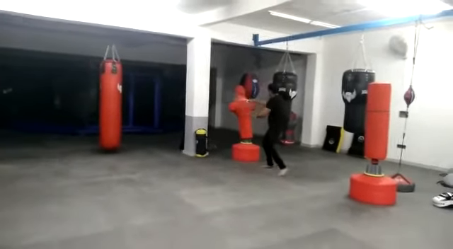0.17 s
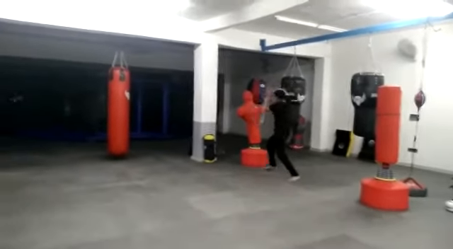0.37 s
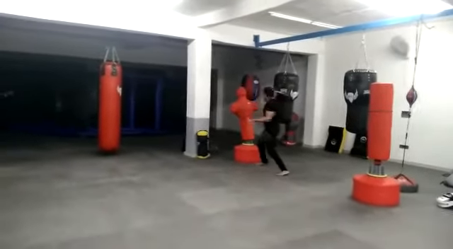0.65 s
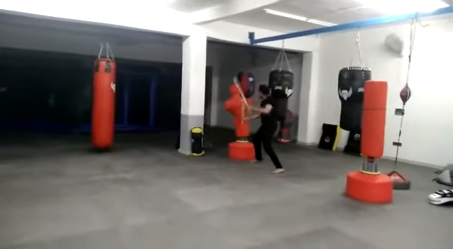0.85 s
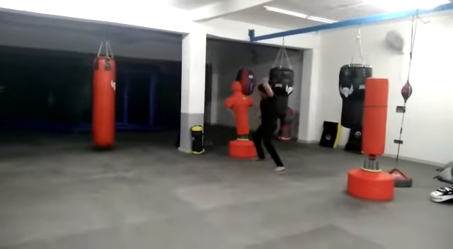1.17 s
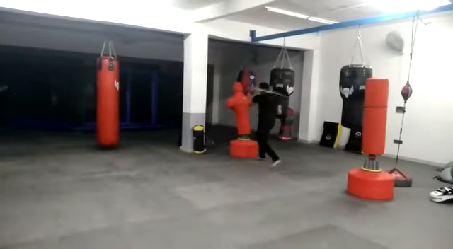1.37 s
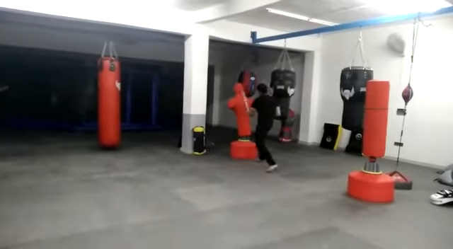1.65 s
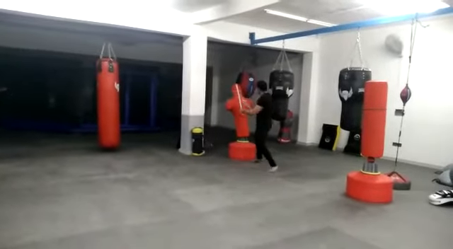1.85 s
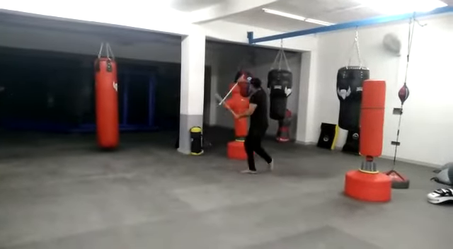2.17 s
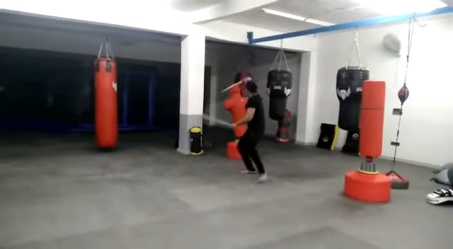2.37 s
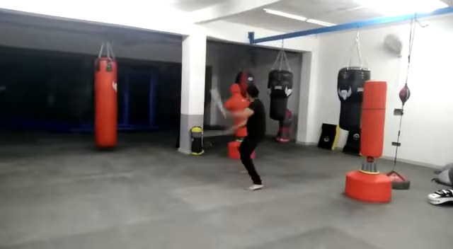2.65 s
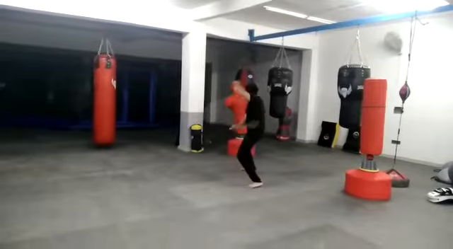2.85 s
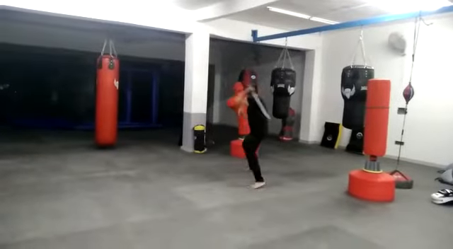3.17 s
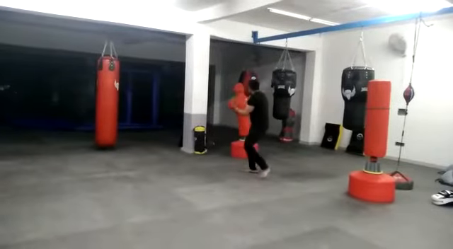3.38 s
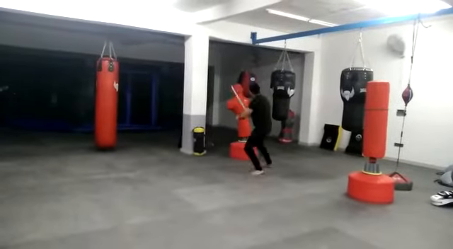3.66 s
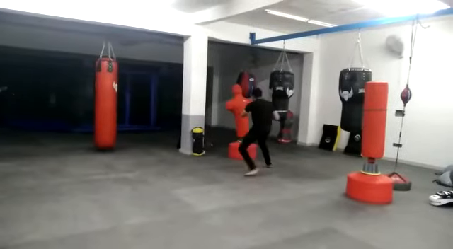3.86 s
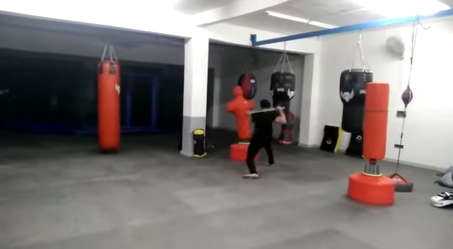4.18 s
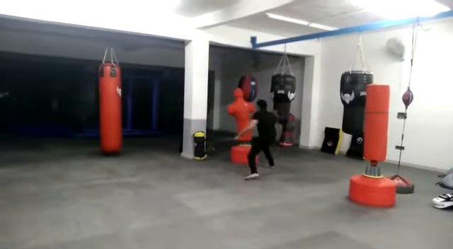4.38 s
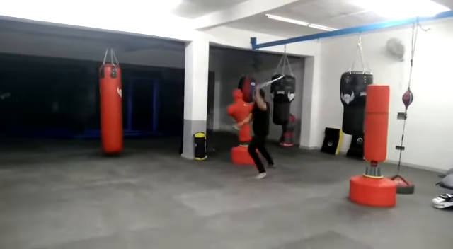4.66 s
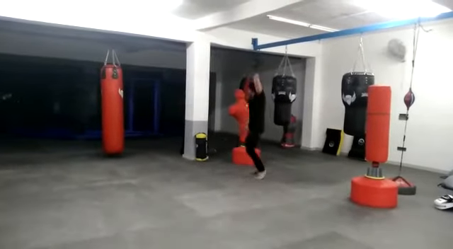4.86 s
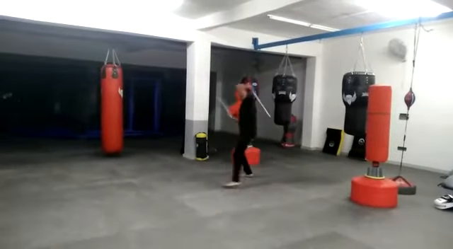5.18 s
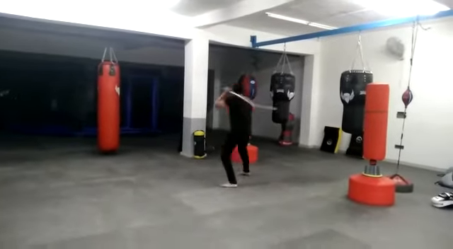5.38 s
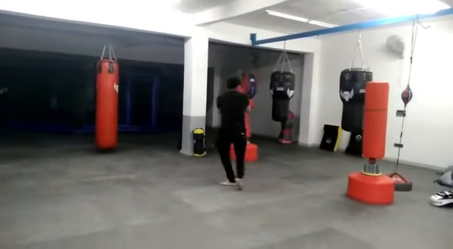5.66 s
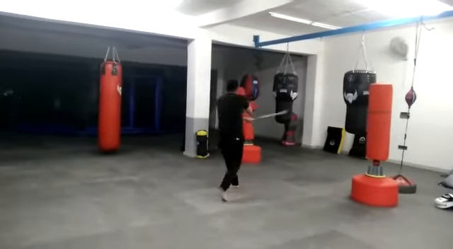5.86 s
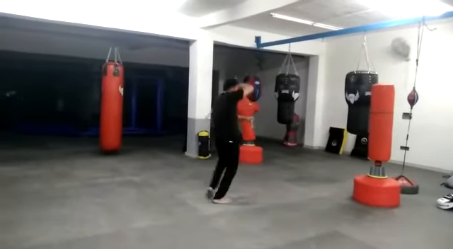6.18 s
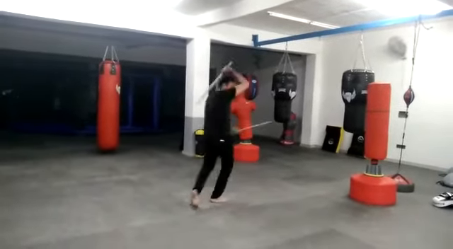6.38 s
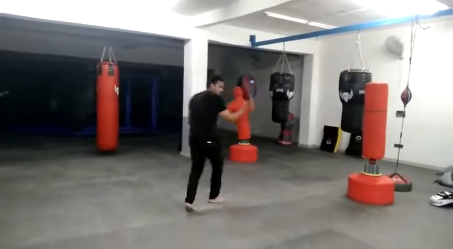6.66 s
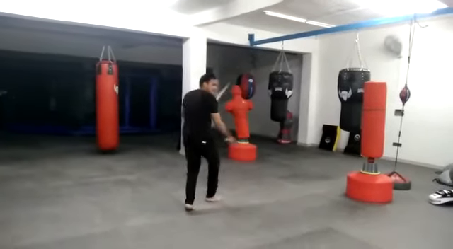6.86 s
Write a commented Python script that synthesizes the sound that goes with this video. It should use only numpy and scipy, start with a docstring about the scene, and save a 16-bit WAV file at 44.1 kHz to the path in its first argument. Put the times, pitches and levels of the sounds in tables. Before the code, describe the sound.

A large, hard-walled gym hall heard through a phone placed well away from the action, with a low steady rumble and a soft grainy mid-band noise that swells and sinks. Bare feet patter in dull low thuds and brush the mats. At about 0.85 s two sharp cracks on a vinyl dummy land almost together, bright and loud, followed by a long echo. At 1.6 s comes a single heavy smack with a deeper padded thump and hollow knock, then a low foot thud. At 2.1 s one lighter, dry wooden clack of stick on stick. From 2.5 to 4.3 s the tail fades over small scuffs and steps. Two weaker, tight double blows hit at 4.4 and 4.65 s, the second duller. From 5 s onward only sliding, hissing soles and soft thuds remain, longest around 5.5 to 6.3 s, as the reverberation dies away by 7 s.

```python
"""A bare gym hall: at its far end someone drills with two sticks on a free-standing punching dummy.
Blows are a noise crack on the vinyl skin, a damped sine thump and shell modes; once the sticks clack.
Bare feet thud (damped sines) and scuff (grainy noise) on the mats; a soft mid-band noise swells and sinks.
The hall rings for up to two seconds and more in the bass, over a low rumble; the phone flattens loud peaks."""
import sys
import numpy as np
from scipy import signal
from scipy.fft import rfft, irfft
from scipy.io import wavfile

SR = 44100
rng = np.random.default_rng(int(sys.argv[2]) if len(sys.argv) > 2 else 0)


def store_wav(level_fs):
    """Save 16-bit WAV to argv[1]."""
    pcm = np.round(np.clip(np.atleast_2d(level_fs), -1, 1) * 32767)
    wavfile.write(sys.argv[1], SR, pcm.T.astype(np.int16))


N = 310032
SIZE = 32768  # samples in one short sound
T = np.arange(SIZE) / SR  # s


def undb(db):
    """Decibels to gain."""
    return 10 ** (np.asarray(db) / 20)


def curve(points, hz):
    """Read a table along a logarithmic frequency axis."""
    table_hz, value = np.transpose(points)
    return np.interp(np.log(hz + 1), np.log(table_hz), value)


def fade(t, t60_s):
    """Exponential decay, 60 dB in t60_s."""
    return np.exp(-np.log(1000) * t / np.maximum(t60_s, 1e-4))


def level(x, db):
    """Scale a short sound so that its energy, spread over a tenth of a second, has this rms."""
    return x * undb(db) / np.sqrt(np.sum(x ** 2) * 10 / SR)


def colour(x, points, tilt_db_per_octave=0):
    """Causal minimum-phase filter with the given spectrum, tilted about 3 kHz."""
    hz = np.fft.rfftfreq(len(x), 1 / SR)
    octaves = np.log2(np.maximum(hz, 400) / 3000)
    gain = undb(curve(points, hz) + tilt_db_per_octave * octaves)
    # fold the cepstrum onto positive time
    cepstrum = irfft(np.log(gain), len(x))
    cepstrum[1:len(x) // 2] *= 2
    cepstrum[len(x) // 2 + 1:] = 0
    return irfft(rfft(x) * np.exp(rfft(cepstrum)), len(x))


def filtered(x, order, hz, kind="low"):
    """Butterworth filter."""
    return signal.sosfilt(signal.butter(order, hz, kind, fs=SR, output="sos"), x)


def add(track, start_s, x):
    """Mix a sound into a track."""
    i = int(start_s * SR)
    track[..., i:i + x.shape[-1]] += x[..., :N - i]


def tail(build_s=0.0063):
    """Dense reflections that build up quickly and die at each frequency's own rate."""
    # decay; the mats soak up a narrow band near 600 Hz: pitch_hz, t60_s
    hall_decay = [(50, 1.8), (120, 2.45), (240, 1.89), (380, 1.6), (500, 0.84), (600, 0.58), (740, 1.03),
                  (1000, 1.53), (1800, 1.93), (2800, 1.56), (4000, 1.195), (5600, 1.025), (8000, 0.87),
                  (13000, 0.47)]
    hz, t, z = signal.stft(rng.standard_normal(4 * SIZE), SR, nperseg=1024)
    decay = fade(t, curve(hall_decay, hz)[:, None])
    x = signal.istft(z * decay, SR)[1]
    build_up = 1 - np.exp(-np.arange(len(x)) / SR / build_s)
    return x * build_up * np.sqrt(10 / SR)


def hall(x, direct_db=-9.5, boom_hz=79, boom_q=12, boom_db=-3.5):
    """Direct sound, first echoes and a tail with a floor-to-ceiling standing wave; stereo in the treble."""
    # first reflections off floor, ceiling and wall: delay_s (varied by up to 10 %), level_db
    first_echoes = [(.0022, -26.5), (.0078, -11), (0.014, -17.5)]
    # difference between the two microphones: pitch_hz, side_db
    stereo_width = [(3700, -75), (4400, -16), (6000, -13), (7500, -4), (14000, -5)]
    mid = tail()
    boom = signal.lfilter(*signal.iirpeak(boom_hz, boom_q, SR), mid)
    mid = mid + undb(boom_db) * boom
    mid[0] += undb(direct_db)
    for delay_s, echo_db in first_echoes:
        mid[int(delay_s * SR * rng.uniform(.9, 1.1))] += undb(echo_db)
    side = colour(tail(), stereo_width)
    return signal.fftconvolve(x[None], np.array([mid + side, mid - side]), axes=1)


def thud(hz, cycles):
    """Padding gives way and springs back: a damped sine, 60 dB down after the given cycles."""
    swing = np.sin(2 * np.pi * hz * T) * fade(T, cycles / hz)
    return filtered(swing, 2, 62, "high")


def air(rms_db=-42):
    """The low steady rumble of the empty hall: filtered noise."""
    # pitch_hz, density_db (per Hz, relative)
    air_spectrum = [(25, -17), (55, 4), (90, -2.5), (140, -11), (220, -20), (330, -17.5), (560, -33),
                    (800, -26.5), (1500, -31), (2500, -37), (4500, -51.5), (7000, -58.5), (14000, -54.5)]
    x = colour(rng.standard_normal(N), air_spectrum)
    return x * undb(rms_db) / np.std(x)


def swell_db(t):
    """Slow rise and fall in level shared by the mid-band noise and the shuffle."""
    # time_s, swell_db
    swell_points = [(0, -12), (.11, -9), (.16, 8.5), (.45, -6.5), (.63, 4.5), (2.6, -1.5), (3.15, -17.5),
                    (3.3, 0.5), (3.8, 4.5), (5.7, -3), (6.5, 3.5), (6.6, -23), (7.03, -11.5)]
    return np.interp(t, *np.transpose(swell_points))


def mid_noise(noise_db=-50.5, grain_db=4, grain_samples=512):
    """A soft, grainy mid-band noise that swells and sinks in level; noise_db holds at 0 dB swell."""
    # pitch_hz, density_db (per Hz, relative)
    mid_spectrum = [(100, 3.5), (330, 3.5), (800, 0.5), (1100, -3), (1400, .5), (1800, -3.5), (2500, -9.5),
                    (4500, -10.5), (5900, -12), (7200, -22.5), (14500, -27.5)]
    grain_levels = rng.standard_normal(N // grain_samples + 1)
    grains = undb(grain_db * np.repeat(grain_levels, grain_samples)[:N])
    noise = colour(rng.standard_normal(N) * grains, mid_spectrum)
    gain = undb(noise_db + swell_db(np.arange(N) / SR))
    return hall(noise / np.std(noise) * gain)[:, :N]


def footfalls(pace_per_s=4.6, shuffle_db=-43.5, shuffle_hz=108, stray=0.15, pitch_spread=0.24, count=64):
    """Placed thuds plus an uneven shuffle that follows the swell: start_s, level_db, thud_hz."""
    # placed low thuds, loud and soft: start_s, level_db, thud_hz
    placed_thuds = [(0.158, -36.5, 115), (1.409, -30.5, 129.5), (1.640, -21, 73), (2.410, -38.5, 85.6),
                    (3.491, -38, 88.5), (3.840, -46.5, 85.5), (5.210, -44, 111.3), (5.905, -43, 78.7),
                    (6.455, -43.5, 92)]
    shift, pitch = rng.standard_normal((count, 2)).T
    times_s = (np.arange(count) + 1 + stray * shift) / pace_per_s
    levels_db = shuffle_db + swell_db(times_s)  # shuffle_db holds at 0 dB swell
    shuffle = zip(times_s, levels_db, shuffle_hz * np.exp(pitch_spread * pitch))
    return placed_thuds + [step for step in shuffle if 0 < step[0] < N / SR]


def sole_hiss(length_s, start_hz=5250, width_hz=1900, sag=.14):
    """A sliding sole hisses in a band whose centre sinks by the share sag as the foot slows."""
    centre_hz = start_hz * (1 - sag * np.tanh(T / length_s))
    band = filtered(rng.standard_normal((2, SIZE)), 2, width_hz / 2)
    carrier = np.exp(2j * np.pi * np.cumsum(centre_hz) / SR)
    return np.real((band[0] + 1j * band[1]) * carrier)


def scuff(length_s, tilt_db_per_octave, grain_db=4, hiss_db=-3):
    """A sole brushes the mat in a grainy swell with a band of hiss; hiss_db is relative to the brush."""
    # pitch_hz, density_db (per Hz, relative)
    brush_spectrum = [(100, 3.5), (350, 1.5), (550, 2), (800, 0), (1400, -7), (2600, -8), (3700, 1.5),
                      (4800, -3), (5900, -7), (7200, -12.5), (10000, -11.5), (14500, -14.5)]
    grains = undb(grain_db * np.repeat(rng.standard_normal(SIZE // 64), 64))
    envelope = np.sqrt(T / length_s) * np.exp(-(T / length_s) ** 2)
    rub = colour(rng.standard_normal(SIZE) * grains * envelope, brush_spectrum, tilt_db_per_octave)
    return level(rub, 0) + level(sole_hiss(length_s) * envelope, hiss_db)


def footwork(cycles=3.4, heel_top_hz=330, floor_db=-10, spot_count=3):
    """Bare heels thud softly and soles scuff, at spots with different echoes."""
    # soles on the mats: start_s, level_db, length_s, tilt_db_per_octave
    scuff_events = [(0.17, -46.5, .11, -2), (0.536, -42.5, 0.09, -1), (1.535, -35.5, .027, -2),
                    (2.614, -51.5, 0.066, 6.5), (3.223, -40.5, 0.016, -0.5), (3.30, -44, 0.071, -1.5),
                    (3.611, -42.5, 0.024, 0), (3.840, -42, 0.034, -1.5), (3.980, -42.5, 0.017, 2),
                    (4.974, -38, 0.096, 3.5), (5.525, -33, 0.13, 3), (5.68, -37.5, 0.54, 0),
                    (6.17, -40, 0.16, 2.5)]
    heels, spots = np.zeros(N), np.zeros((spot_count, N))
    for k, (start_s, level_db, hz) in enumerate(footfalls()):
        step = level(filtered(thud(hz, cycles), 2, heel_top_hz), level_db)
        add(heels, start_s, step)
        add(spots[k % spot_count], start_s, step)
    for k, (start_s, level_db, length_s, tilt) in enumerate(scuff_events):
        add(spots[k % spot_count], start_s, level(scuff(length_s, tilt), level_db))
    # the thuds also travel straight through the floor
    return sum(hall(spot) for spot in spots)[:, :N] + undb(floor_db) * heels


def crack(t60_s):
    """A brief ragged contact: decaying noise with its spectrum evened out."""
    z = rfft(rng.standard_normal(SIZE) * fade(T, t60_s))
    return irfft(z / np.abs(z)) * fade(T, 10 * t60_s)


def ring(modes):
    """Damped modes, swinging in alternate directions at the point of contact."""
    x = np.zeros(SIZE)
    for k, (hz, db, t60_s) in enumerate(modes):
        x += (-1) ** k * undb(db) * np.sin(2 * np.pi * hz * T) * fade(T, t60_s)
    return x


def blows(slap_t60_s=0.018, cycles=4.9, knock_db=0.5, knock_rise=2.43, straight_db=-15):
    """Each blow slaps the skin, thumps the padding and, the harder it is, knocks the shell."""
    # some are followed by a second crack or a close echo:
    # start_s, slap_db, slap_tilt_db_per_octave, thump_db, thump_hz
    blow_events = [(0.8546, -6, 1.5, -20.5, 156), (0.88, -6.5, 2.5, -24, 162),
                   (1.5865, -5, -0.84, -13.5, 150), (4.3940, -15.5, 1, -13, 208),
                   (4.4031, -10.5, -1.8, -28.5, 120), (4.648, -13, -1.5, -19, 89),
                   (4.6549, -15.5, -2.95, -19.5, 145)]
    # pitch_hz, density_db (per Hz, relative)
    slap_spectrum = [(60, -8.5), (200, -7), (370, -3), (600, -9.5), (900, -6), (1300, -0.5), (2400, -0.5),
                     (3800, 2), (5000, 0), (6000, -2.5), (7100, -12), (10000, -15.5), (14500, -17.5)]
    # hollow shell: mode_hz, level_db (relative), t60_s
    shell_modes = [(369, 0, 0.014), (446, -0.5, 0.016), (684, -4.5, 0.015), (873, -2.5, 0.022),
                   (977, 2, 0.0074)]
    out = np.zeros((2, N))
    for start_s, slap_db, tilt, thump_db, thump_hz in blow_events:
        slap = level(colour(crack(slap_t60_s), slap_spectrum, tilt), slap_db)
        thump = level(thud(thump_hz, cycles), thump_db)
        # knock_db follows a 0 dB slap; knock_rise is dB of knock per dB of slap
        knock = level(ring(shell_modes), knock_db + knock_rise * slap_db)
        body = thump + knock
        # skin and body find their own paths through the hall
        add(out, start_s, hall(slap))
        add(out, start_s, hall(body))
        # the broad body also sounds straight across the floor
        add(out, start_s, undb(straight_db) * body)
    return out


def clacks(click_t60_s=0.017, clear_db=-16):
    """Stick on stick: a shorter contact of wood on wood that leaves the sticks free to ring."""
    # start_s, click_db, ring_db
    clack_events = [(2.1030, -18.5, -25.5)]
    # pitch_hz, density_db (per Hz, relative)
    click_spectrum = [(300, -53), (750, -10.5), (1150, -2), (1900, 0), (3000, 4.5), (4500, -3),
                      (5900, -7.5), (7200, -22.5), (14500, -26.5)]
    # bending modes: mode_hz, level_db (relative), t60_s
    stick_modes = [(1731, -1, 0.1), (2580, -13, .02), (3100, 4, 0.059), (3620, 4, 0.048), (4020, -6, .07)]
    out = np.zeros((2, N))
    for start_s, click_db, ring_db in clack_events:
        click = level(colour(crack(click_t60_s), click_spectrum), click_db)
        add(out, start_s, hall(click) + hall(level(ring(stick_modes), ring_db)))
        # they meet in free air, so more of the click arrives straight
        add(out, start_s, undb(clear_db) * click)
    return out


def scene():
    """Mid-band noise, feet and sticks over the hall's own rumble."""
    return air() + mid_noise() + footwork() + clacks() + blows()


def record(dry, drive_db=-2.3, ceiling=0.82, knee=9, top_hz=14300):
    """The phone drops the deepest bass, flattens the loudest peaks and cuts the top."""
    x = undb(drive_db) * filtered(dry, 4, 45, "high")
    x = x / (1 + np.abs(x / ceiling) ** knee) ** (1 / knee)
    return signal.sosfilt(signal.ellip(10, .2, 70, top_hz, fs=SR, output="sos"), x)


dry = scene()
out = record(dry)
store_wav(out)
```